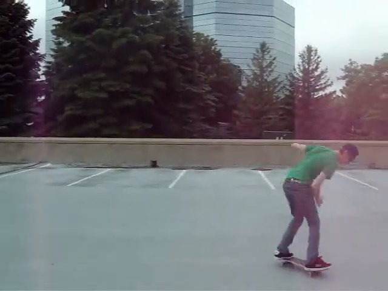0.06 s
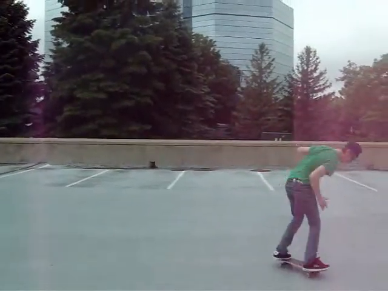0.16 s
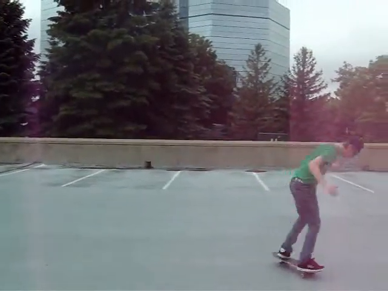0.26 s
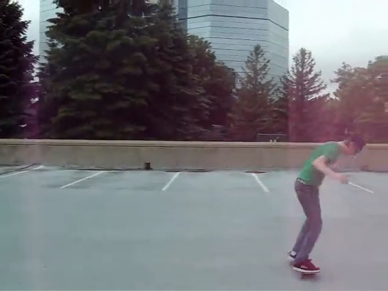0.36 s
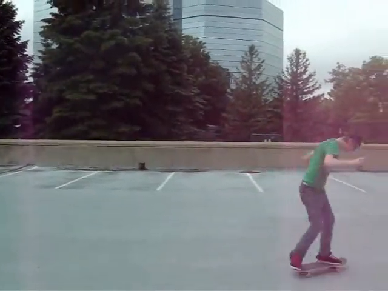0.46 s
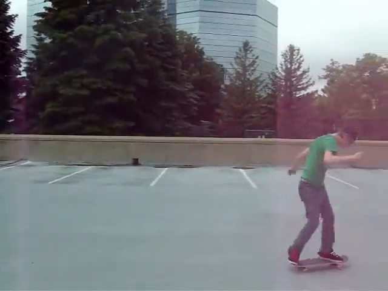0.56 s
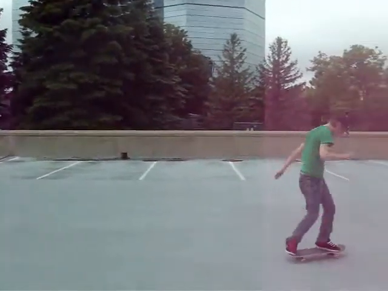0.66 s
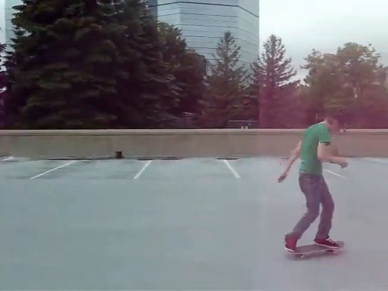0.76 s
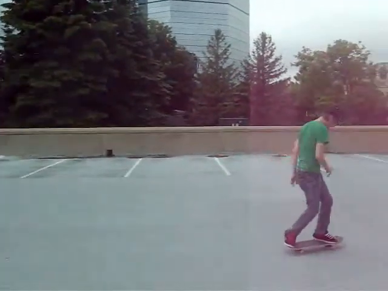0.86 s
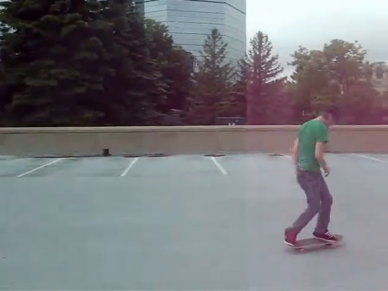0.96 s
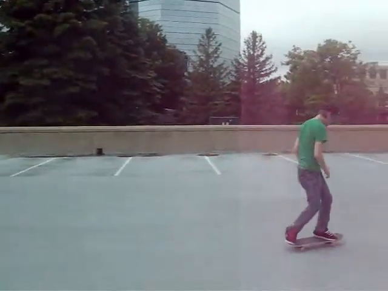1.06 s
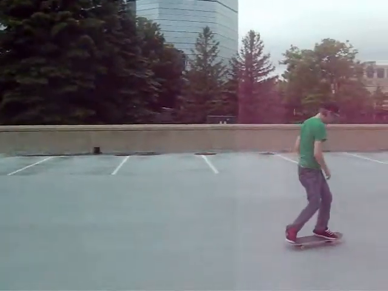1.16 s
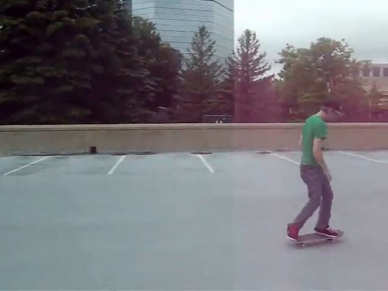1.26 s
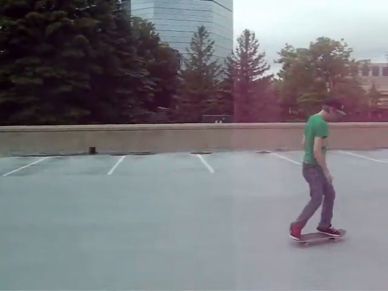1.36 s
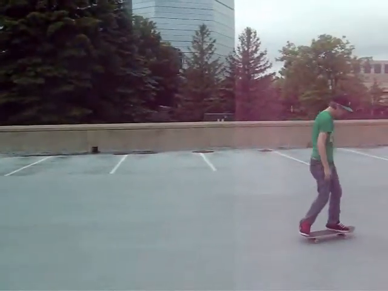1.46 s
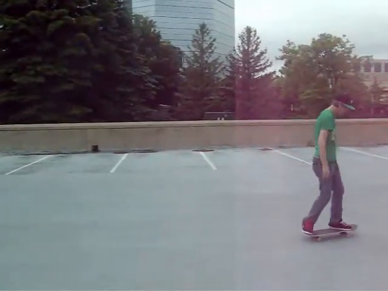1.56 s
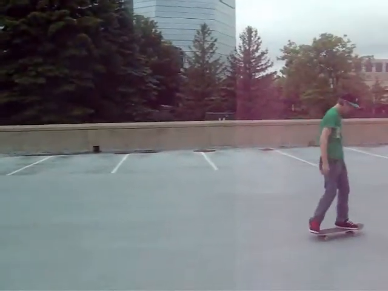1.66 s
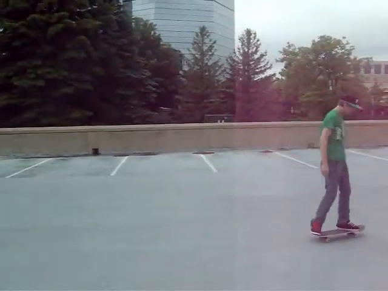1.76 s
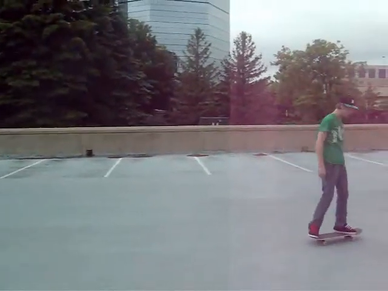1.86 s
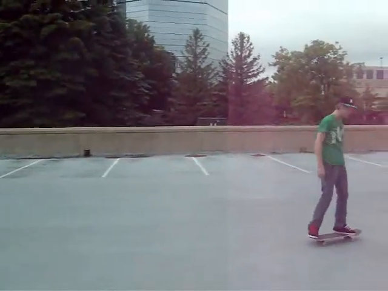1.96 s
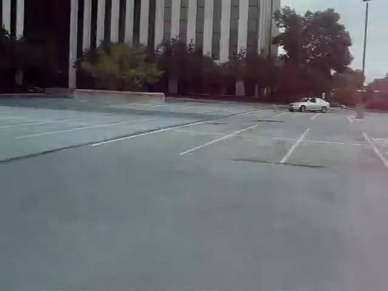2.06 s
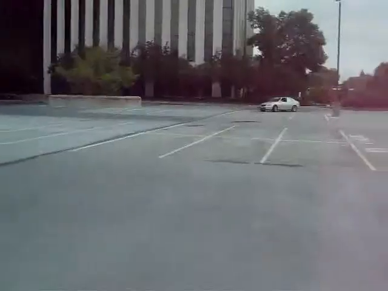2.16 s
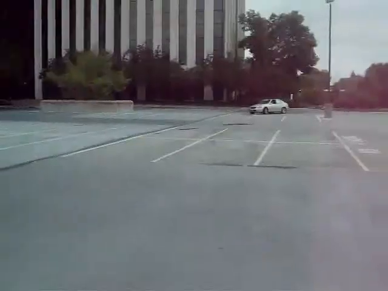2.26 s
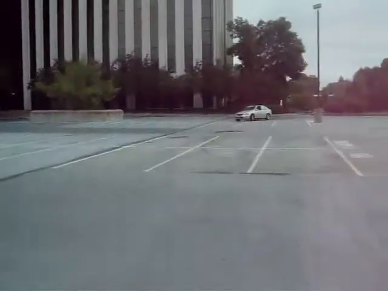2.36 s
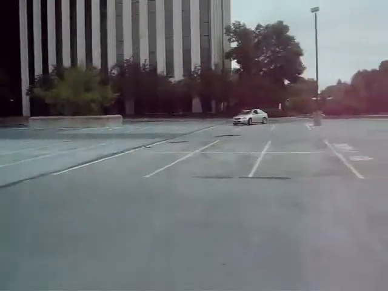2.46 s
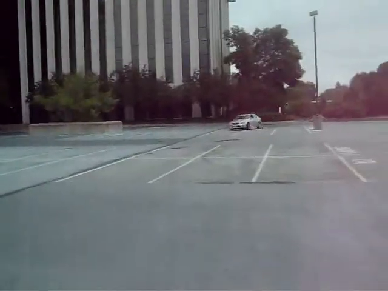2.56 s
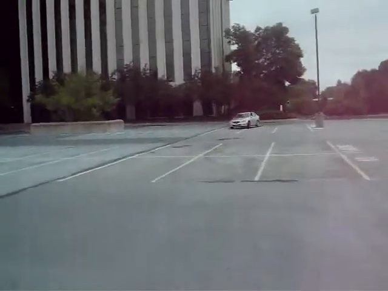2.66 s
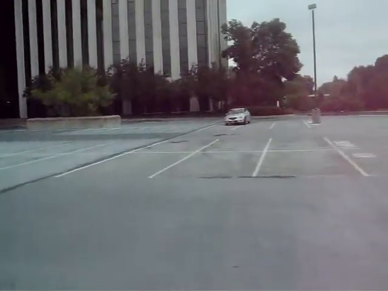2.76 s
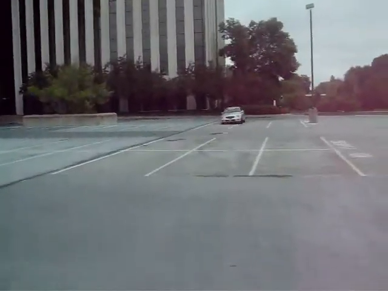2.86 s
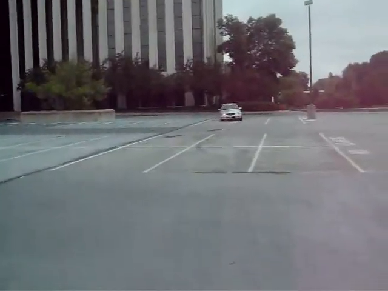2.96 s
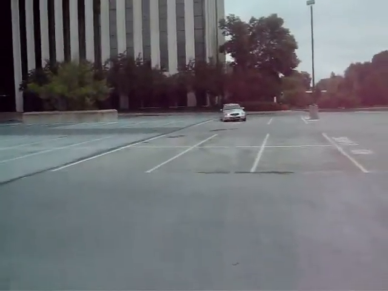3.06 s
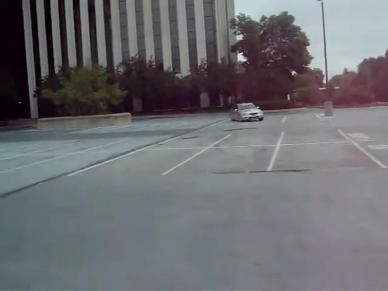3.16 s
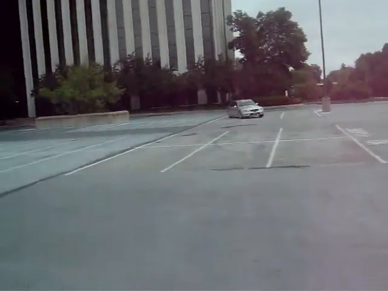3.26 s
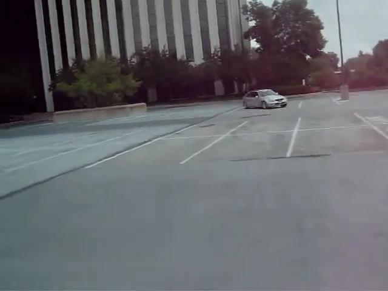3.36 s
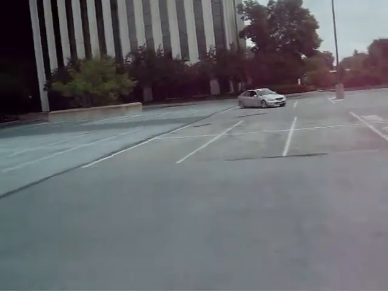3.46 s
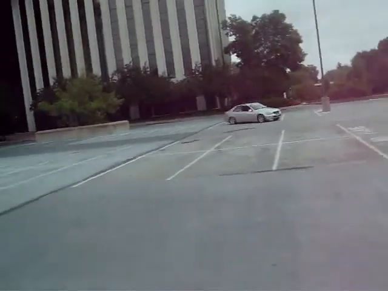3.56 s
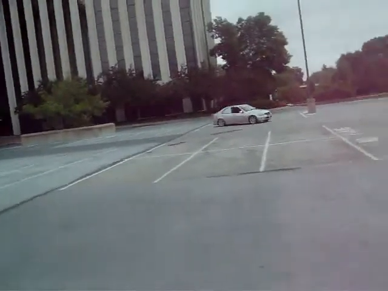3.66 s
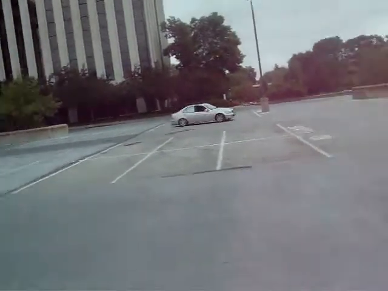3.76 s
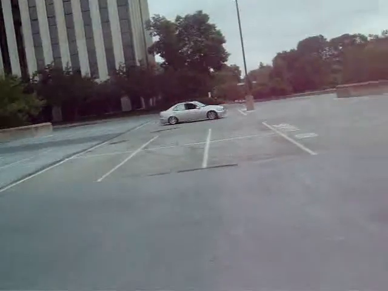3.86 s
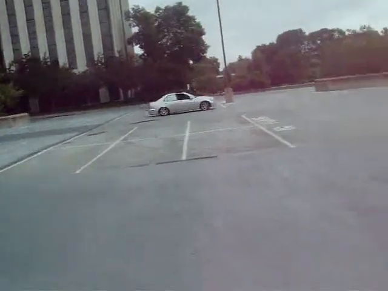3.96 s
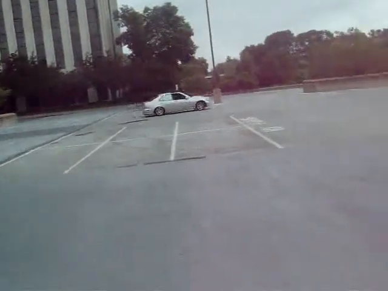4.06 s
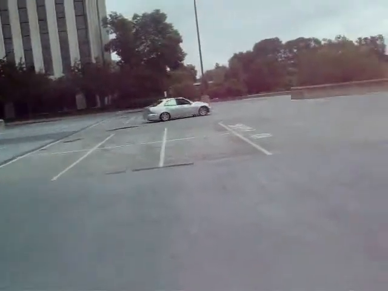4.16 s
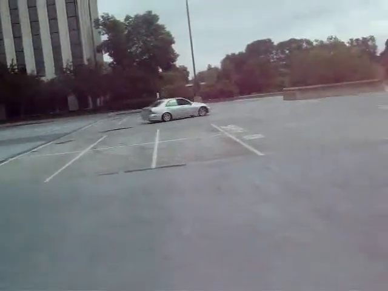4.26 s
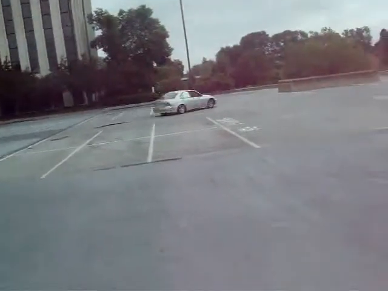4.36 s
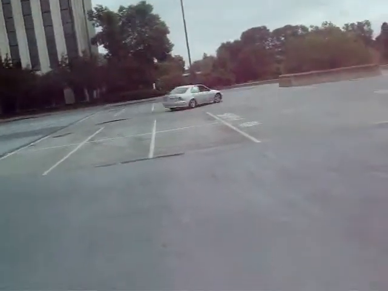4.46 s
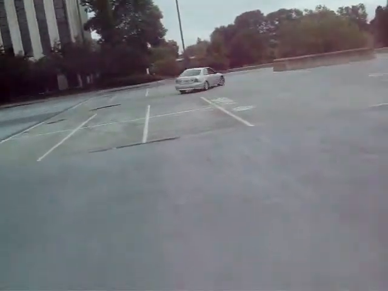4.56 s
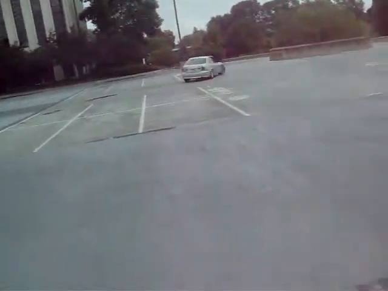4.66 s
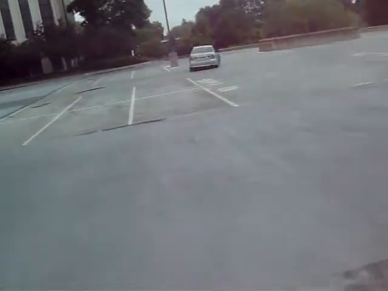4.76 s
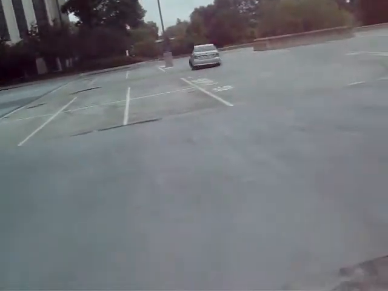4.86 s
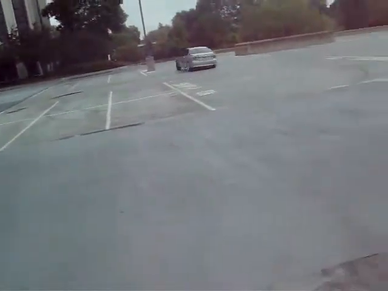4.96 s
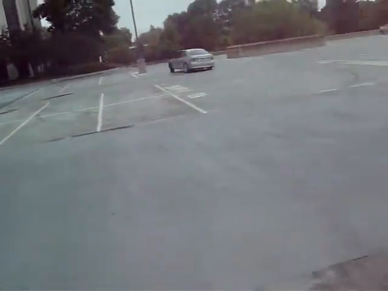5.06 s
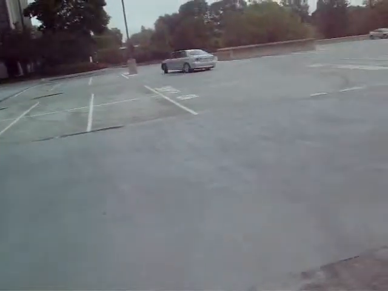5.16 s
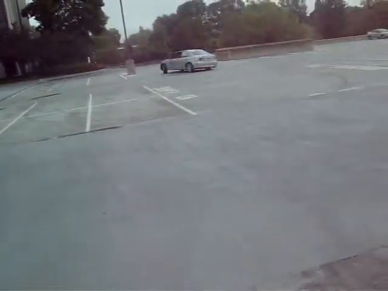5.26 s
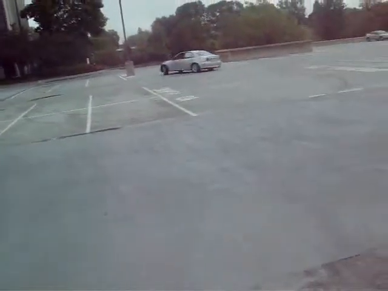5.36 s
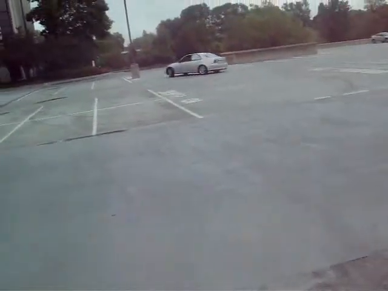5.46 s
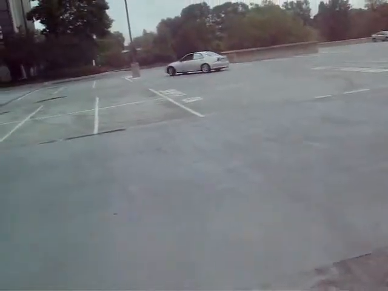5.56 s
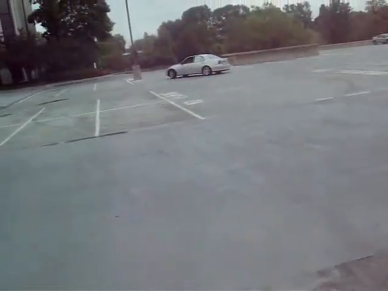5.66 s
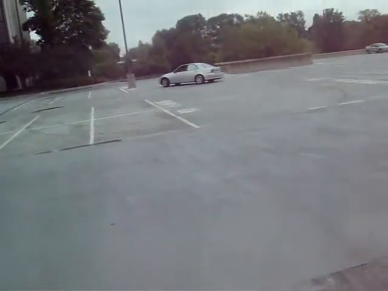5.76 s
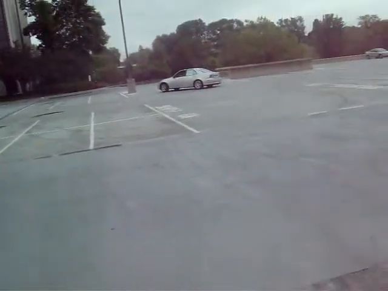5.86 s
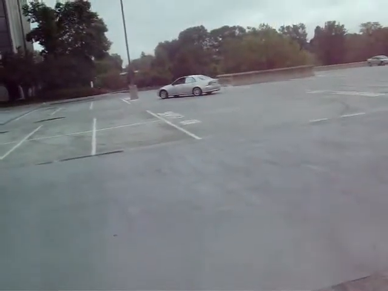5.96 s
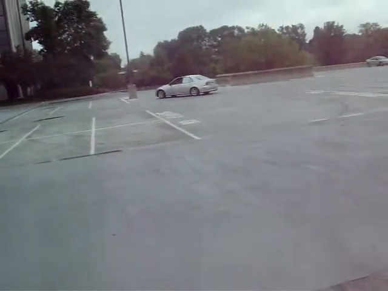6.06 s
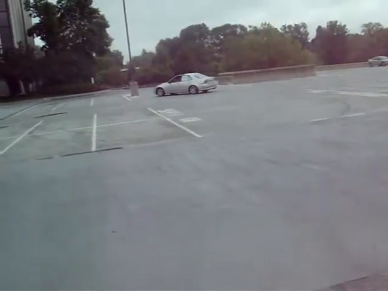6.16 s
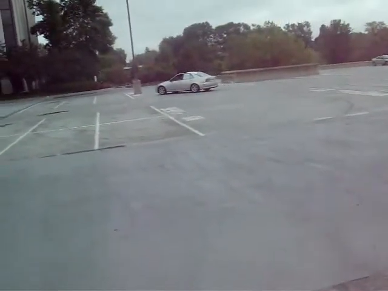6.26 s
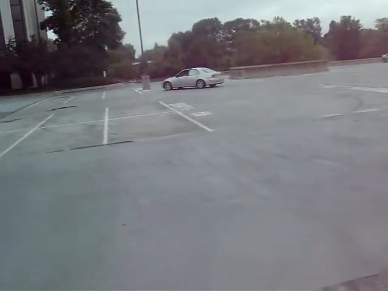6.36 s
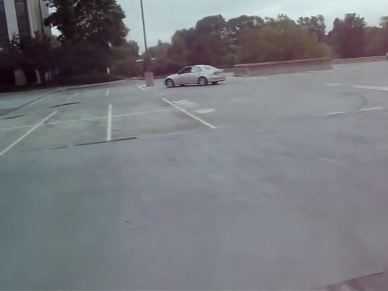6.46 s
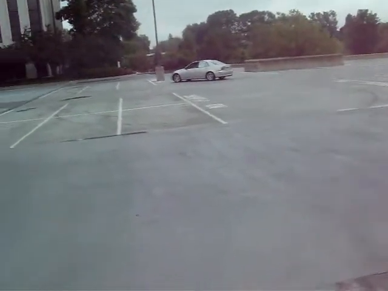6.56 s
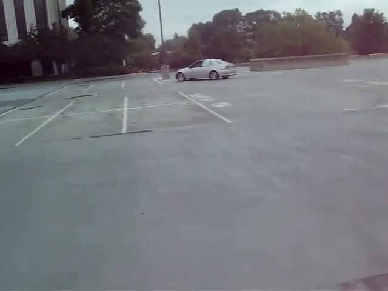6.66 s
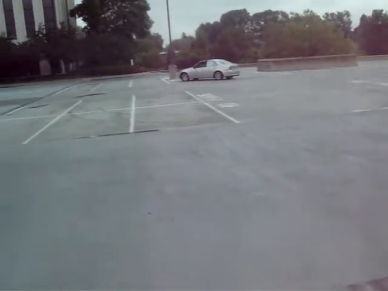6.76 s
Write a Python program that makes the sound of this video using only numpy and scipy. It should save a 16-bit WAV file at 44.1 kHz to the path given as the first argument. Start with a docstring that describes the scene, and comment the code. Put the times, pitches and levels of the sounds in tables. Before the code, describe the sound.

Skateboard wheels rumble and clack; after a sudden break, a car's engine rises and its tyres screech, ending in wind buffets.

```python
"""A car's tyres squeal as it slides in a circle some way off, their tread sticking and slipping on concrete.
A skateboard comes first: it rolls over a concrete deck and rattles as it lands, small birds far off.
After a hard cut and a short silence the engine revs up through its exhaust's resonances, and the slide
builds until the microphone overloads. Wind buffets at the end."""
import sys
import numpy as np
from scipy import signal
from scipy.io import wavfile

SR = 44100
rng = np.random.default_rng(int(sys.argv[2]) if len(sys.argv) > 2 else 0)


def transcribe(u):
    """Save the signal u as a 16-bit wav file named by the first command-line argument.

    u: samples, shape (n,) or (channels, n), limited to [-1, 1]; the rate is SR.
    q: integer samples, one column per channel.
    """
    v = np.clip(np.atleast_2d(u).T, -1, 1)
    q = np.round(v * 32767).astype(np.int16)
    wavfile.write(sys.argv[1], SR, q)


N = 300321
TIME = np.arange(N) / SR


def amp(db):
    """Decibels to gain."""
    return np.exp(np.asarray(db) * np.log(10) / 20)


def rms_one(x):
    """Scale to rms 1."""
    return x / np.sqrt(np.mean(x ** 2) + 1e-20)


def bandpass(x, low_hz, high_hz):
    """A gentle band-pass filter."""
    return signal.sosfilt(signal.butter(2, [low_hz, high_hz], "band", fs=SR, output="sos"), x)


def automation(rows):
    """A gate with 20 ms fades outside the first and last breakpoint, then a curve for each column."""
    times, *columns = np.transpose(rows)
    gate = np.clip(np.minimum(TIME - times[0], times[-1] - TIME) / .02 + 1, 0, 1)
    return [gate] + [np.interp(TIME, times, column) for column in columns]


def drift(rate_hz):
    """Smooth random modulation of rms 1: coarse noise through a double one-pole low-pass."""
    step = int(SR / rate_hz / 30)
    pole = np.exp(-2 * np.pi * rate_hz * step / SR)
    slow = signal.lfilter([1], [1, -2 * pole, pole * pole], rng.standard_normal(N // 8 + 102))
    settled = slow[100:N // step + 102]
    return np.interp(np.arange(N) / step, np.arange(len(settled)), rms_one(settled))


def gritty(grit_db, rate_hz):
    """Two noises whose strength jumps with the grain of the concrete."""
    return rng.standard_normal((2, N)) * amp(grit_db * drift(rate_hz))


def coloured(noises, eq, flicker_db, span):
    """Shape two noises in third-octave bands that flicker partly together; rms 1 within the span."""
    out, shared = np.zeros(N), drift(5)
    edges = 22 * 2 ** np.arange(0, 8.5, 1 / 3)
    hz, db = np.transpose(eq)
    for k, (low, high) in enumerate(zip(edges, edges[1:])):
        level_db = np.interp(np.log(low * high) / 2, np.log(hz), db)
        flicker = (.7 * shared + drift(8))[span]
        out[span] += amp(level_db + flicker_db * flicker) * bandpass(noises[k % 2, span], low, high)
    out[span] = rms_one(out[span])
    return out


def whine(hz=3790, level_db=-50.5):
    """The camera gives off a faint, slightly wavering tone."""
    return amp(level_db + 0.88 * drift(20)) * np.sin(2 * np.pi * hz * TIME + 0.95 * drift(23))


# Distant chirps: t/s, length/s, start f/Hz, end f/Hz, level/dB
CHIRPS = [(1.143, 0.04, 3300, 2760, -37), (1.2, 0.028, 2800, 3170, -42), (1.248, .02, 4600, 4800, -47),
          (1.34, 0.02, 2350, 2480, -33), (1.478, 0.027, 2740, 3100, -34), (1.595, 0.022, 5600, 5600, -44),
          (1.652, 0.041, 2970, 3470, -39), (2.38, .02, 2700, 3000, -32), (2.477, 0.014, 2920, 3300, -28),
          (2.65, .014, 2703, 2550, -24)]
def birds():
    """Small birds whistle short glides."""
    out = np.zeros(N)
    for start_s, length_s, from_hz, to_hz, db in CHIRPS:
        start, size = round(start_s * SR), round(length_s * SR)
        phase = 2 * np.pi * np.cumsum(np.linspace(from_hz, to_hz, size)) / SR
        out[start:start + size] += amp(db) * np.hanning(size) * np.sin(phase)
    return out


# Wind bed: t/s, level/dB
WIND_BED = [(5.6, -37.5), (5.96, -38.5), (6.192, -24), (6.81, -25)]
# Wind thumps: t/s, level/dB, f/Hz
WIND_THUMPS = [(6.288, -12, 205), (6.33, -5, 181.6), (6.385, -1, 241.8), (6.418, -8, 161),
               (6.49, -10, 232.5), (6.535, -1.5, 257), (6.556, -4, 178.6), (6.635, -10, 213.5),
               (6.759, -6.5, 250)]
def wind():
    """Wind on the microphone: lumpy low noise, and pressure jolts that swing once or twice."""
    gate, level_db = automation(WIND_BED)
    lumps = rng.standard_normal(N) * amp(2.7 * drift(25))
    out = gate * amp(level_db) * rms_one(bandpass(lumps, 70, 300))
    t = TIME[:int(.04 * SR)]
    for start_s, db, hz in WIND_THUMPS:
        start = round(start_s * SR)
        jolt = amp(db) * np.sin(2 * np.pi * hz * t) * np.exp(-hz * t * 1.04)
        out[start:start + len(t)] -= jolt[:N - start]
    return signal.sosfilt(signal.butter(2, 60, "high", fs=SR, output="sos"), out)


# Skateboard rumble: t/s, level/dB
ROLL_LEVEL = [(0.0, -26), (0.14, -24), (0.68, -19), (0.84, -24.5), (1.06, -22), (1.39, -19.5),
              (2.13, -20.5)]
# Its tone colour: f/Hz, relative level/dB
ROLL_EQ = [(15, -36.5), (25, -10.5), (94, -2.5), (235, -4), (367, -1), (523, -3), (800, 3), (922, -3.5),
           (1170, -6.5), (1440, -7.5), (2100, -25), (4270, -25), (5530, -42), (7000, -72), (9100, -89),
           (15400, -120)]
def board_roll():
    """Hard wheels hum over rough concrete."""
    _, level_db = automation(ROLL_LEVEL)
    grit = gritty(grit_db=0.93, rate_hz=100)
    return amp(level_db) * coloured(grit, ROLL_EQ, flicker_db=0.5, span=slice(0, N // 3))


# Hits of wheels and trucks: t/s, peak level/dB, brightness/(dB per octave), rattle length/s
BOARD_HITS = [(0.284, -5, -18, 0.017), (0.296, -7, -25, 0.003), (.301, -5.5, -6, 0.0075),
              (.306, 1.5, -14, 0.0041), (0.502, -21, 4, 0.0025), (0.517, -20, 1.5, 0.0033),
              (0.573, -4.5, 0.5, 0.0072), (0.589, -8.5, -1, 0.012), (0.613, -12.5, -7.5, 0.03),
              (0.632, -2.5, -13, 0.012), (.644, -2, 7, 0.0038), (0.678, -6.5, -7, 0.033),
              (0.705, -4, -4.5, 0.023), (.722, -6.5, -10, 0.019), (0.738, 0.5, -5.5, 0.0094),
              (0.747, -5, 9, 0.015), (0.758, -6, 8, 0.019), (0.769, -3, 2, 0.014), (0.781, -13.5, 4, 0.012),
              (.826, -13, -18, 0.019), (2.054, -25, 5, 0.0032), (2.103, -10.5, -16, 0.016),
              (2.123, -17.5, -5, 0.003)]
# Ring of the board's deck and trucks: f/Hz, relative level/dB, t60/s
BOARD_MODES = [(384.7, -15.5, 0.37), (530, 6.5, 0.022), (825, 6.5, 0.016), (1220, -20, 0.0049),
               (1440, 7.5, 0.02), (1800, -10.5, 0.014), (2350, -3.5, 0.016), (3100, -30.5, 0.0055),
               (3990, -17, 0.015), (5630, -56, 0.003)]
def board_knocks(flex_from_s=0.72, flex_to_s=0.8, flex_db=21):
    """Each knock is a short swelling rattle of contacts that rings the board's modes in its own mix."""
    out, t = np.zeros(N + SR), TIME[:int(.06 * SR)]
    contacts = rng.standard_normal((len(BOARD_HITS), len(t)))
    mixes_db = rng.normal(0, 4.8, (len(BOARD_HITS), len(BOARD_MODES)))
    for (start_s, peak_db, tilt_db, length_s), contact, mix_db in zip(BOARD_HITS, contacts, mixes_db):
        soft = signal.lfilter([1], [1, -.75], contact)   # urethane and wood make soft contacts
        force = np.pad(soft * t * np.exp(-3 * t / length_s), (0, 3 * len(t)))
        if flex_from_s < start_s < flex_to_s:   # the landing flexes the deck: its lowest mode rings on
            mix_db[0] += flex_db
        ring = 0
        for (hz, level_db, t60), own_db in zip(BOARD_MODES, mix_db):
            radius, angle = amp(-60 / (t60 * SR)), 2 * np.pi * hz / SR
            mode = signal.lfilter([1, 0, -1], [1, -2 * radius * np.cos(angle), radius ** 2], force)
            ring = ring + amp(level_db + own_db + tilt_db * np.log2(hz / 1000)) * rms_one(mode)
        start = round(start_s * SR)
        out[start:start + len(ring)] += amp(peak_db) * ring / np.abs(ring).max()
    return out[:N]


# Hiss while the car's tyres still grip: t/s, level/dB
HISS_LEVEL = [(2.22, -68), (2.384, -40), (2.66, -34), (2.968, -32.5), (3.488, -30), (3.5, -47)]
# Tread-groove resonances: low f/Hz, high f/Hz, relative level/dB
GROOVE_BANDS = [(2100, 2400, -5.5), (2620, 2900, 0.5), (4100, 5080, -4.5)]
def grip_hiss():
    """Air pumped through the tread grooves hisses in a few bands."""
    gate, level_db = automation(HISS_LEVEL)
    air = gritty(grit_db=1.7, rate_hz=100)[0]
    bands = sum(amp(db) * rms_one(bandpass(air, low, high)) for low, high, db in GROOVE_BANDS)
    return gate * amp(level_db) * rms_one(bands)


# Road bed under the car: t/s, roar level/dB, roar bass shelf/dB, scrub level/dB
ROAD_BED = [(2.22, -20, 8, -34), (2.72, -18.5, 2, -31), (3.11, -14, 2.5, -25), (3.4, -13.5, 4, -22.5),
            (3.46, -21, 0, -27.5), (3.71, -17.5, -2, -22), (3.92, -17.5, -6, -20.5), (4.14, -25, -9.5, -19),
            (4.35, -18, -9, -19.5), (4.48, -27, -4, -16), (5.29, -36.5, 3.5, -19.5), (5.7, -30.5, 1, -18),
            (6.03, -23, -4, -26.5), (6.4, -18.5, -1, -34.5), (6.81, -20, -2, -33.5)]
# Tone colour of the roar: f/Hz, relative level/dB
ROAR_EQ = [(15, -52), (25, -21.5), (168, -5.5), (288, -5), (345, -2.5), (389, -7), (558, 1.5), (1150, -2.5),
           (1270, -6), (1460, -6.5), (3000, -43.5), (3900, -71.5), (6600, -120)]
# Tone colour of the scrub: f/Hz, relative level/dB
SCRUB_EQ = [(410, -45.5), (700, -21), (899, -16), (1010, 1.5), (1210, -1), (1590, -17.5), (2040, -14),
            (2330, -18), (2700, -15), (4490, -22), (7000, -37), (9100, -76), (15400, -120)]
def road_noise(shelf_hz=200):
    """The car's low roar on the concrete and the broad scrub of its rubber."""
    _, roar_db, shelf_db, scrub_db = automation(ROAD_BED)
    span = slice(N // 4, N)
    roar = amp(roar_db) * coloured(gritty(grit_db=1.2, rate_hz=89), ROAR_EQ, flicker_db=1.47, span=span)
    bass = signal.filtfilt(*signal.butter(1, shelf_hz, fs=SR), roar)
    scrub = coloured(gritty(grit_db=2.3, rate_hz=110), SCRUB_EQ, flicker_db=1.0, span=span)
    return roar + (amp(shelf_db) - 1) * bass + amp(scrub_db) * scrub


# Rev-up: t/s, firing f/Hz, level before the exhaust/dB
REVS = [(2.2, 104.4, -29), (2.44, 110.7, -22), (2.7, 112.3, -18), (3.0, 118.5, -18), (3.12, 122.9, -23),
        (3.2, 140.6, -14.5), (3.39, 182, -11), (3.46, 193.1, -16.5), (3.67, 234.7, -19),
        (3.89, 262.6, -12.5), (4.05, 276.3, -17), (4.1, 283.2, -23), (4.38, 296.4, -19),
        (4.45, 292.4, -32.5), (4.65, 286, -35)]
# Engine partials: multiple of the firing rate
PARTIALS = [1, 2, 2.5, 3, 4, 5]
# Their balance: relative level/dB
PARTIAL_DB = [-5, 0, -10, -3, -3.5, -6.5]
# Exhaust response with two main peaks: f/Hz, gain/dB
EXHAUST_EQ = [(100, -11.5), (150, -12), (215, -14.5), (285, -6.5), (355, 0.5), (440, -11.5), (500, -3.5),
              (556, 1), (585, -5.5), (630, -5.5), (800, -12.5), (950, -21)]
def engine():
    """Multiples of the firing rate light up in turn as they sweep through the exhaust's resonances."""
    gate, firing_hz, level_db = automation(REVS)
    phase = 2 * np.pi * np.cumsum(firing_hz * (1 + 0.0032 * drift(10.5))) / SR
    note = 0
    for multiple, partial_db in zip(PARTIALS, PARTIAL_DB):
        exhaust_db = np.interp(multiple * firing_hz, *np.transpose(EXHAUST_EQ), right=-60)
        gain = amp(level_db + partial_db + exhaust_db + 2.4 * drift(10.5))
        note = note + np.sqrt(2) * gain * np.sin(multiple * phase)
    return gate * note


def stick_slip(hz, jitter, voices, flutter_db, step_db, harmonics_db):
    """Rubber sticks and slips near one pitch; each voice wanders and flutters, step_db from the last."""
    tone = power = 0
    for k in range(voices):
        wander = .7 * drift(25.024) + .6 * drift(118.8)
        phase = 2 * np.pi * np.cumsum(hz * (1 + jitter * wander)) / SR
        wave = sum(amp(db) * np.sin(n * phase) for n, db in enumerate(harmonics_db, 1))
        tone = tone + amp(flutter_db * drift(26) + step_db * k) * wave
        power = power + amp(step_db * k) ** 2 / 2
    return tone / np.sqrt(power)


# Squeaks and whistles, the first from the board's wheels: t/s, length/s, f/Hz, level/dB
SQUEAK_CUES = [(2.095, 0.026, 1483, -20), (2.805, 0.062, 1290, -15), (2.985, 0.12, 1242, -21),
               (4.2, .4, 3330, -37), (4.75, .45, 4369, -32.5), (5.278, .27, 3014, -23.5),
               (5.55, .15, 3105, -27.5)]
def squeaks():
    """Slipping rubber gives cleaner tones that swell, hold and fade; long ones have softer edges."""
    hz, gain = np.zeros(N), np.zeros(N)
    for start_s, length_s, own_hz, db in SQUEAK_CUES:
        fade_s = .012 + .1 * length_s
        envelope = np.clip(np.minimum(TIME - start_s, start_s + length_s - TIME) / fade_s + .5, 0, 1)
        hz[envelope > 0] = own_hz
        gain += amp(db) * envelope
    return gain * stick_slip(hz, jitter=.019, voices=2, flutter_db=1.0, step_db=3.5, harmonics_db=[0])


# Rasp about an octave above the squeal: t/s, f/Hz, pitch jitter/ratio, level/dB, 2nd harmonic/dB
TYRE_RASP = [(2.9, 2315, .05, -39, -71), (3.24, 2320, 0.053, -28, -47), (3.46, 2390, 0.044, -27.5, -49),
             (3.56, 2420, .05, -36.5, -52), (3.73, 2502, .05, -23, -44), (4.46, 2238, 0.061, -24, -41),
             (4.8, 2318, .05, -20.5, -34), (5.0, 2250, .035, -20.5, -42), (5.3, 2127, .055, -22.5, -33.5),
             (5.45, 2085, 0.0597, -25.5, -39), (5.62, 2120, .035, -18, -45.5),
             (6.6, 2143, 0.039, -37.5, -60)]
# Another tyre's late howl: t/s, f/Hz, pitch jitter/ratio, level/dB, 2nd harmonic/dB, 3rd harmonic/dB
TYRE_HOWL = [(4.1, 1681, 0.029, -54, -41, -53), (4.6, 1690, .045, -28, -37, -45),
             (4.839, 1720, .045, -27, -29.5, -44), (4.97, 1720, .04, -40, -35.5, -46),
             (5.2, 1732, 0.049, -16.5, -26.5, -35.5), (5.36, 1718, 0.0495, -17.5, -29, -32),
             (5.5, 1618, .045, -12, -26, -29.5), (5.759, 1800, .032, -15.5, -32.5, -41.5),
             (6.04, 1790, .04, -15, -34, -61), (6.48, 1773, 0.048, -26.5, -48, -63),
             (6.81, 1740, 0.064, -31.5, -63, -54)]
def upper_slip(layer):
    """Unsteadily slipping tread adds a rough layer above the squeal: the rasp or the howl."""
    gate, hz, jitter, *harmonics_db = automation(layer)
    return gate * stick_slip(hz, jitter, voices=3, flutter_db=2.5, step_db=2.5, harmonics_db=harmonics_db)


# Lead squeal: t/s, f/Hz, level/dB
TYRE_SQUEAL = [(3.3, 1118, -39), (3.368, 1228, -16.5), (3.422, 1231, -5), (3.614, 1278, -6),
               (3.664, 1308, -9.5), (3.86, 1297, -7.5), (3.95, 1221, -5.5), (4.07, 1147, -7.5),
               (4.546, 1178, -8), (4.64, 1066, -6), (4.71, 1133, -8), (4.94, 1092, -8.5), (5.0, 1017, -4.5),
               (5.25, 1045, -10.5), (5.4, 1017, -6.5), (5.45, 1018, -14), (5.71, 1055, -14),
               (5.8, 1062, -10.5), (5.876, 1054, -6), (5.968, 1072, -10), (6.078, 1076, -23),
               (6.254, 1037, -17), (6.4, 1054, -27.5), (6.81, 1030, -32)]
# Brief dropouts where the squeal's tone breaks: centre t/s, half-width/s, depth/dB
SQUEAL_DIPS = [(3.521, 0.013, 8.5), (3.963, .008, 6), (4.019, .014, 9.5), (4.261, 0.0084, 13),
               (4.637, 0.0081, 15), (5.034, 0.0057, 22), (5.199, 0.0095, 12), (5.326, 0.019, 10)]
# Squeal roughness: t/s, pitch jitter/ratio, drop per further tyre/dB, wheel-hop vibrato depth/ratio
SQUEAL_ROUGHNESS = [(3.3, .025, 8, 0.02), (3.45, .026, 9.5, 0.054), (3.95, 0.03, 5.5, 0.044),
                    (4.1, .08, 0.5, 0.019), (4.85, 0.071, 3.5, 0), (5.0, 0.014, 7.5, 0.000085),
                    (6.1, 0.013, 3.5, 0.0018), (6.81, .03, 1.5, 0.0017)]
def squeal(hop_hz=8.1, hop_crest_s=3.515):
    """Three sliding tyres sing; wheel hop swings the pitch, and the level dips briefly now and then."""
    gate, hz, level_db = automation(TYRE_SQUEAL)
    dip_db = sum(depth * np.exp(-((TIME - at) / width) ** 2) for at, width, depth in SQUEAL_DIPS)
    _, jitter, drop_db, hop_depth = automation(SQUEAL_ROUGHNESS)
    vibrato = 1 + hop_depth * np.cos(2 * np.pi * hop_hz * (TIME - hop_crest_s))
    return gate * stick_slip(hz * vibrato, jitter, voices=3, flutter_db=0.5, step_db=-drop_db,
                             harmonics_db=[level_db - dip_db])


def car(echo_count=40, echo_db=-23, decay_db_per_s=100):
    """Engine and sliding tyres echo off far walls, over dry road noise and hiss."""
    direct = engine() + squeal() + upper_slip(TYRE_RASP) + upper_slip(TYRE_HOWL)
    taps = np.zeros(int(.2 * SR))
    taps[rng.integers(300, len(taps), echo_count)] = rng.standard_normal(echo_count)
    taps *= amp(echo_db - decay_db_per_s * TIME[:len(taps)])
    echoes = signal.fftconvolve(direct, taps)[:N]
    return direct + echoes + road_noise() + grip_hiss()


def scene(cut_s=2.133, car_in_s=2.201, fade_s=0.0078, mic_stop_hz=7730):
    """Two scenes through a dull microphone: the skateboard cuts off, then the car fades in fast."""
    details = birds() + squeaks() + whine()
    board = board_roll() + board_knocks() + details
    slide = car() + wind() + details
    mic = signal.cheby2(10, 60, mic_stop_hz, fs=SR, output="sos")
    board, slide = signal.sosfilt(mic, [board, slide])
    fade_in = np.clip((TIME - car_in_s) / fade_s, 0, 1)
    return (board * (TIME < cut_s) + slide * fade_in)[None]


def record(dry, knee=6, headroom=1.25, ceiling=.96, stop_hz=15700):
    """The amplifier rounds the peaks, the converter clips them flat, then the top end is cut."""
    rounded = dry / (1 + np.abs(dry / headroom) ** knee) ** (1 / knee)
    clipped = np.clip(rounded, -ceiling, ceiling)
    return signal.sosfilt(signal.cheby2(12, 60, stop_hz, fs=SR, output="sos"), clipped)


dry = scene()
out = record(dry)
transcribe(out)
```